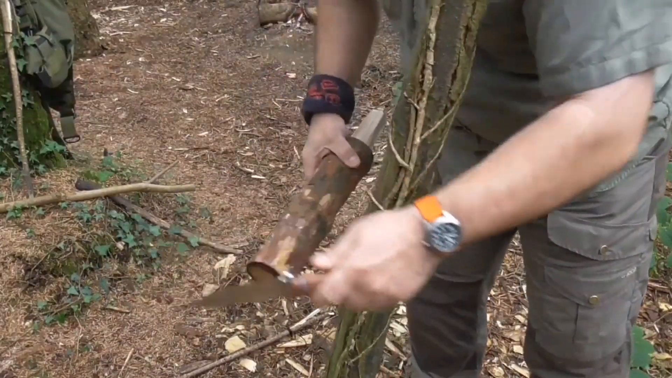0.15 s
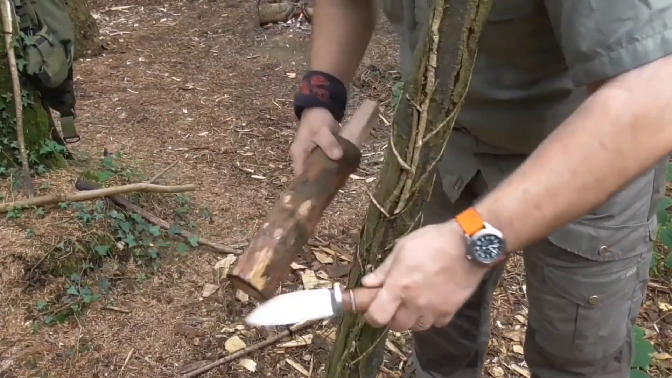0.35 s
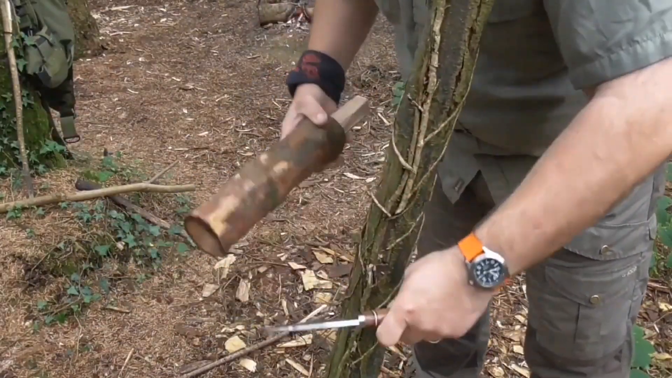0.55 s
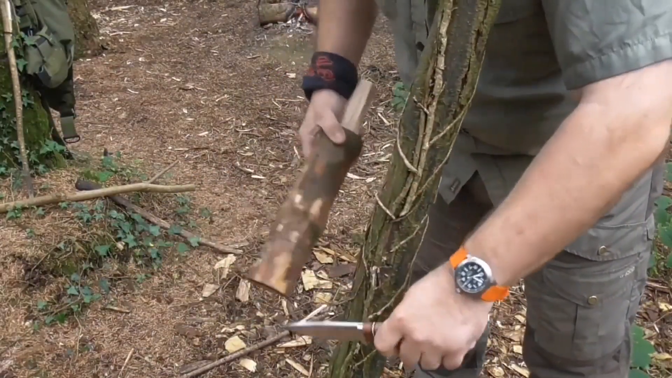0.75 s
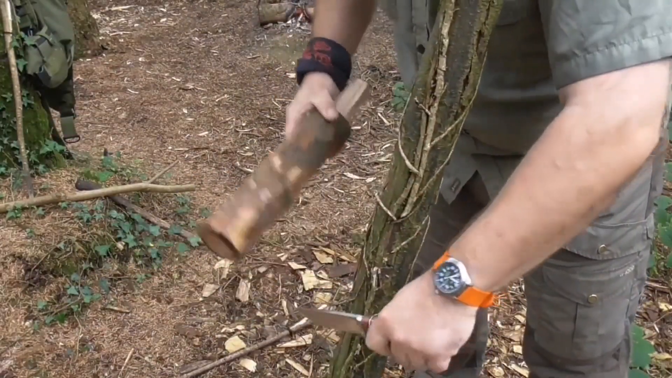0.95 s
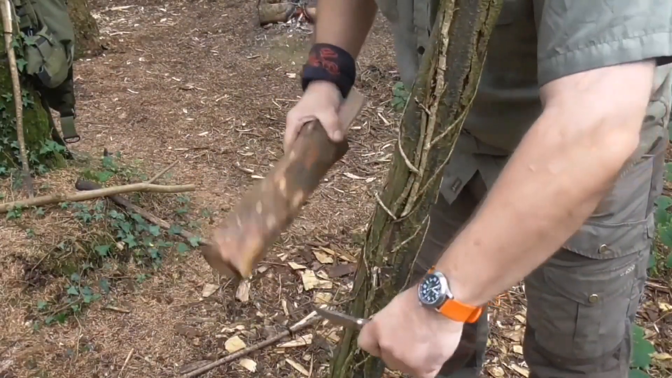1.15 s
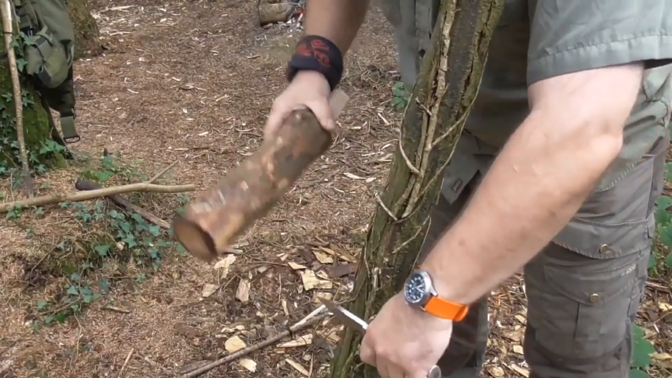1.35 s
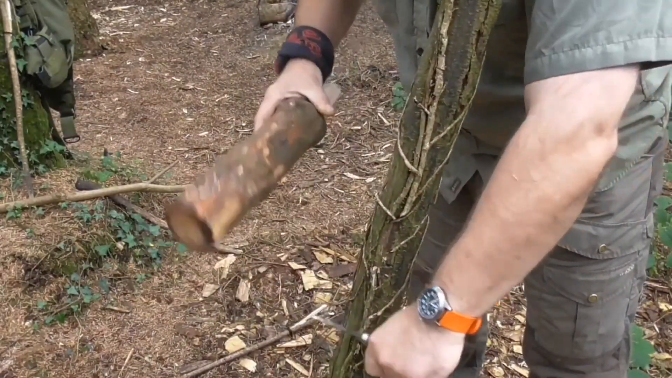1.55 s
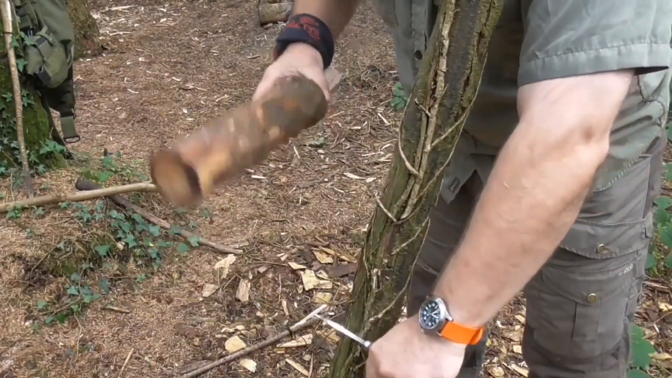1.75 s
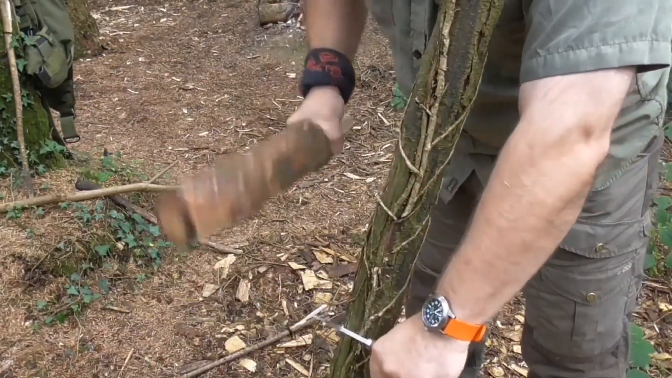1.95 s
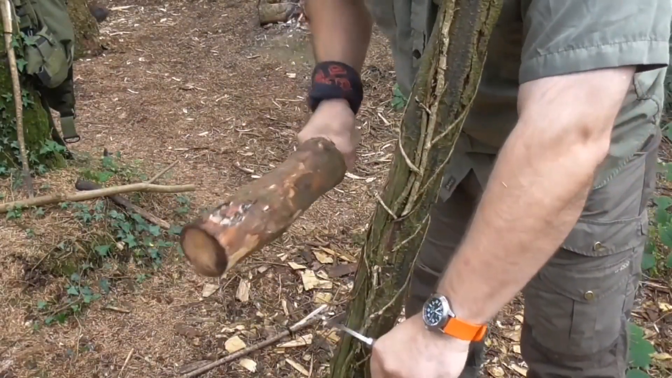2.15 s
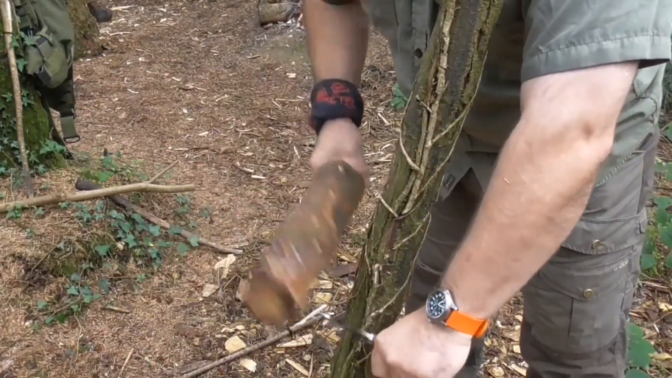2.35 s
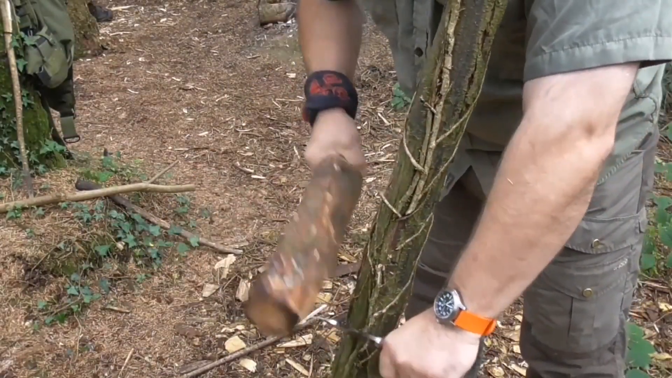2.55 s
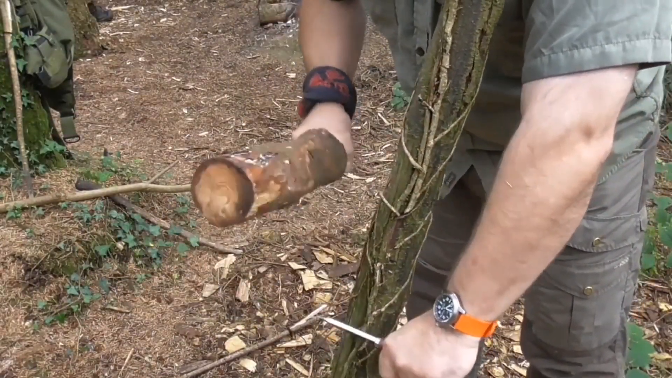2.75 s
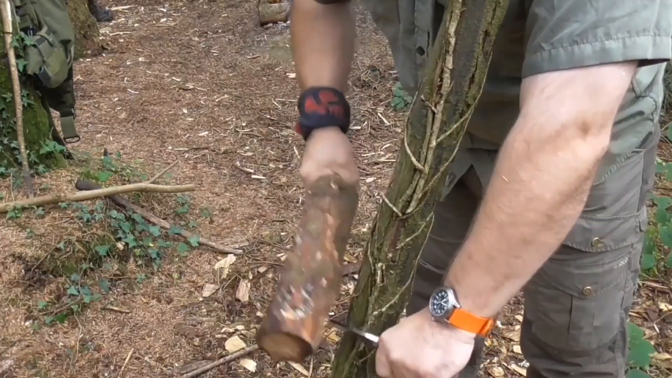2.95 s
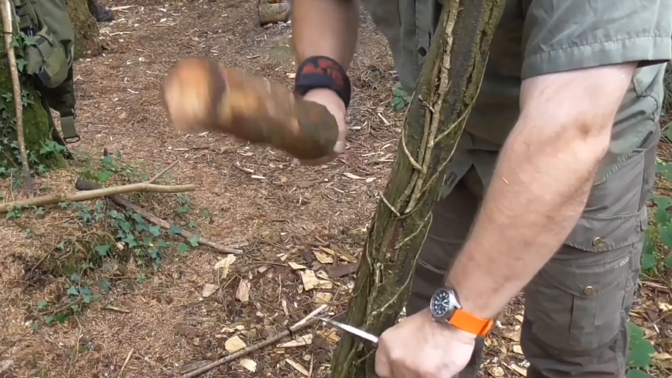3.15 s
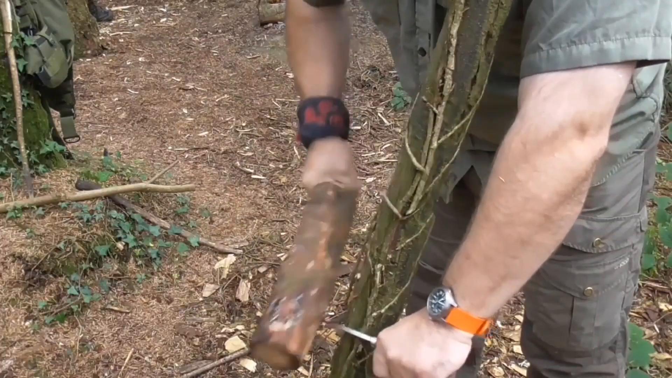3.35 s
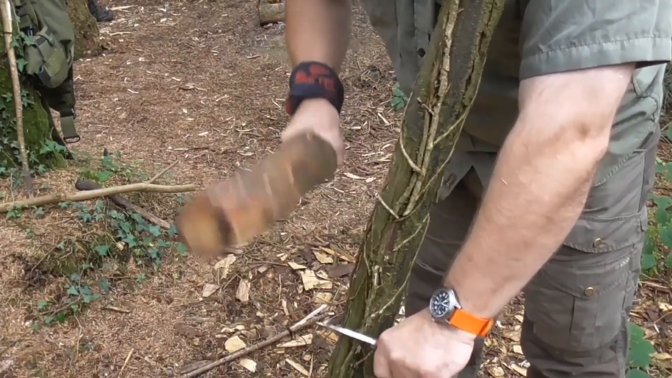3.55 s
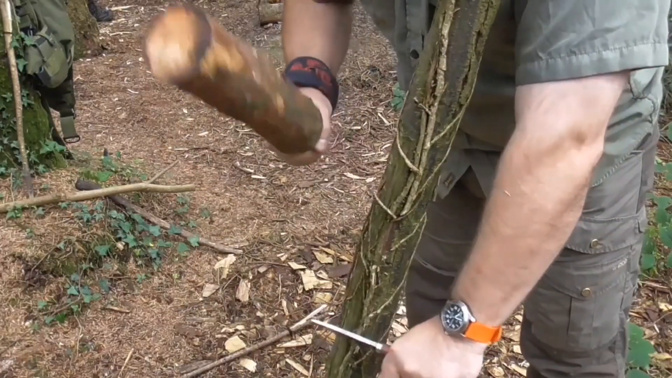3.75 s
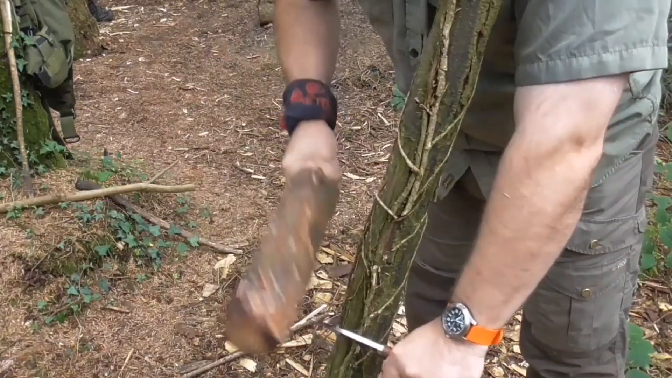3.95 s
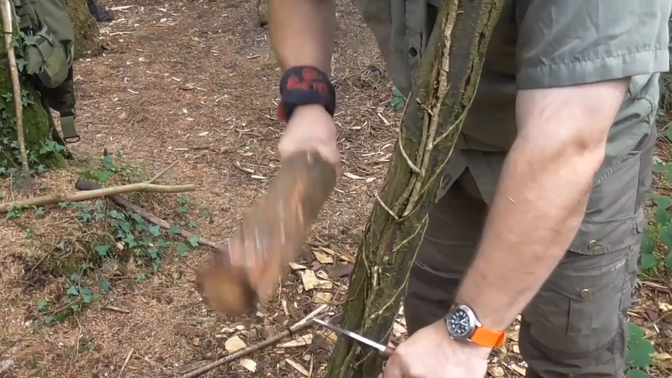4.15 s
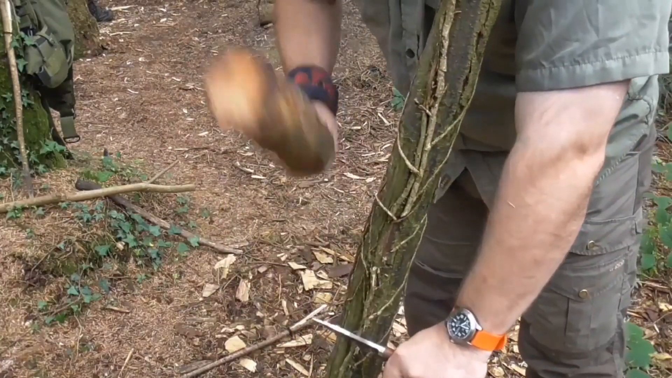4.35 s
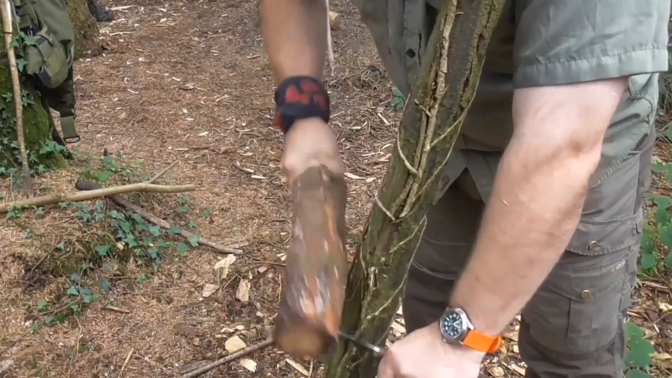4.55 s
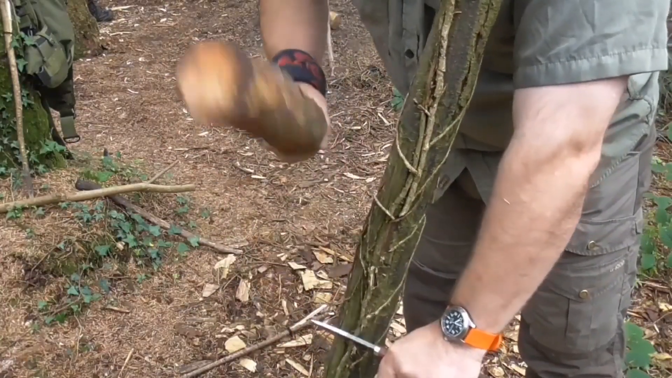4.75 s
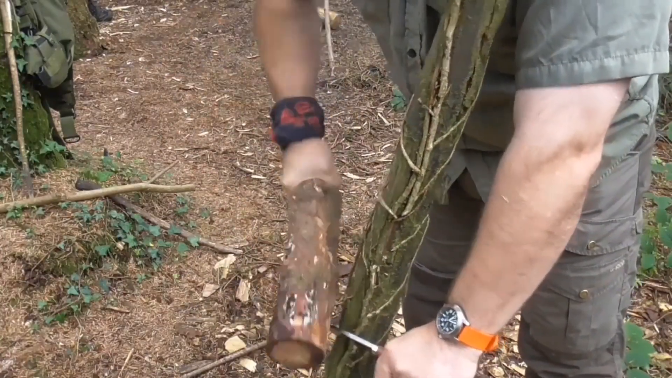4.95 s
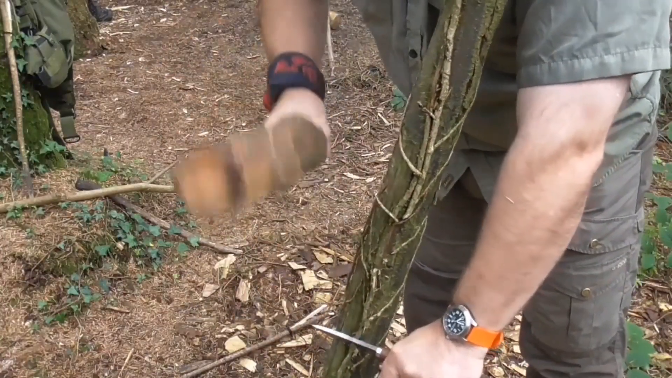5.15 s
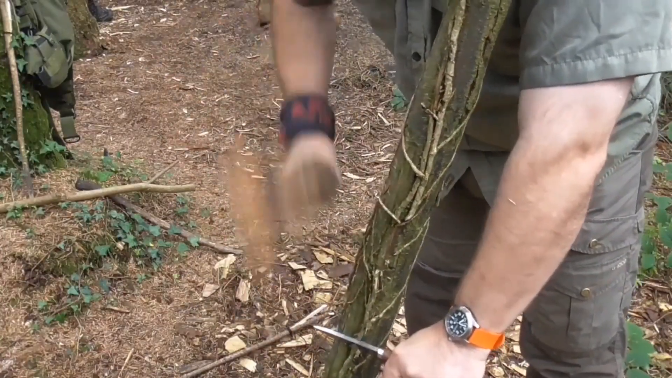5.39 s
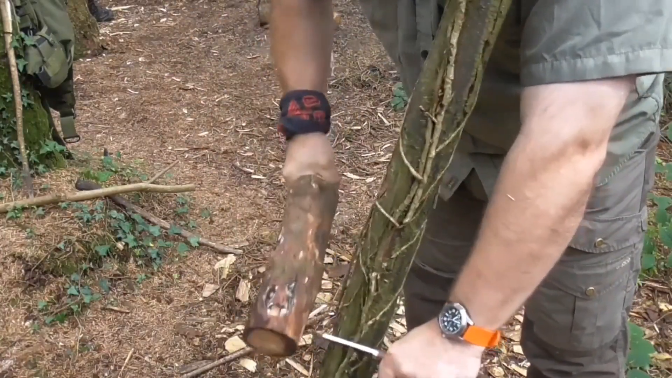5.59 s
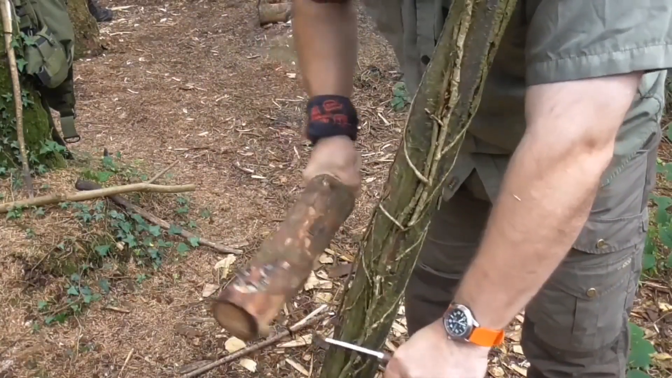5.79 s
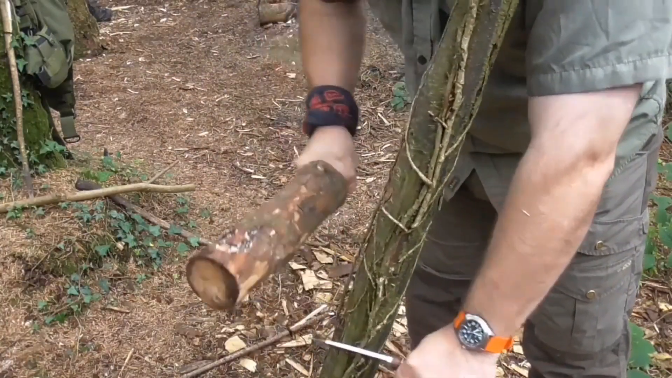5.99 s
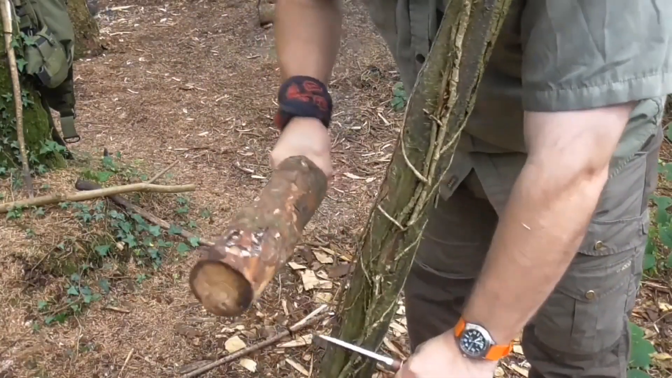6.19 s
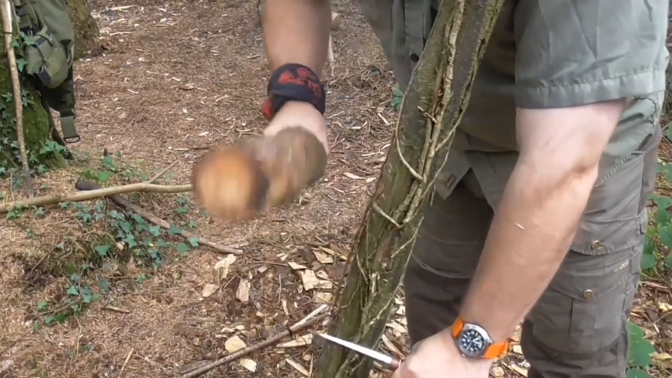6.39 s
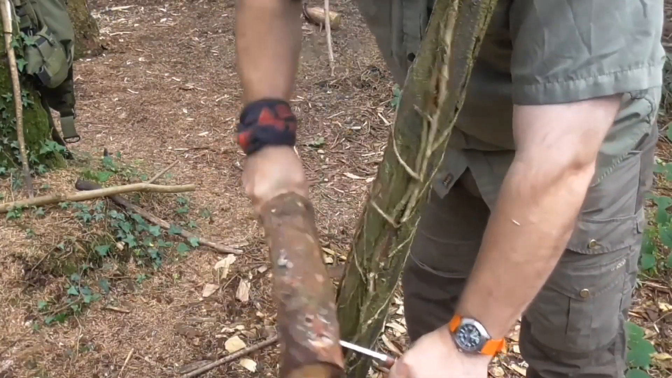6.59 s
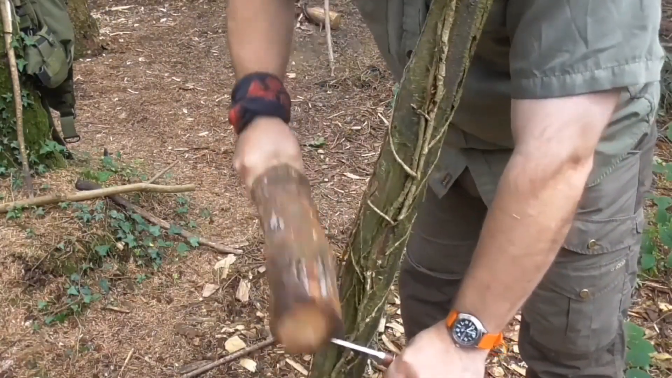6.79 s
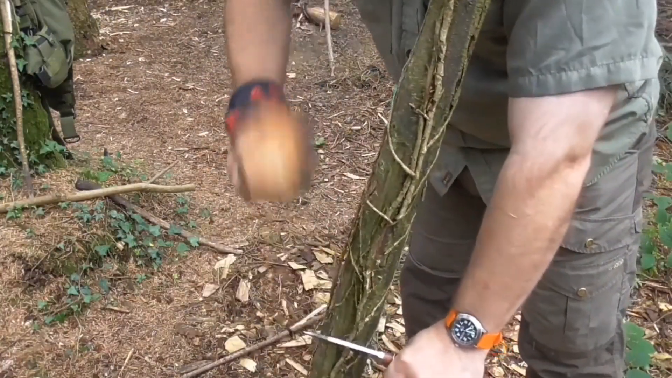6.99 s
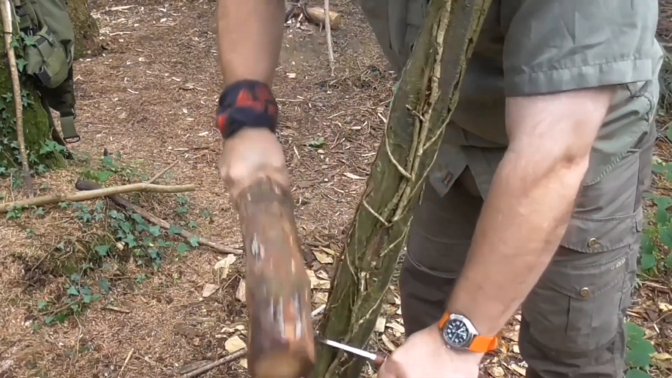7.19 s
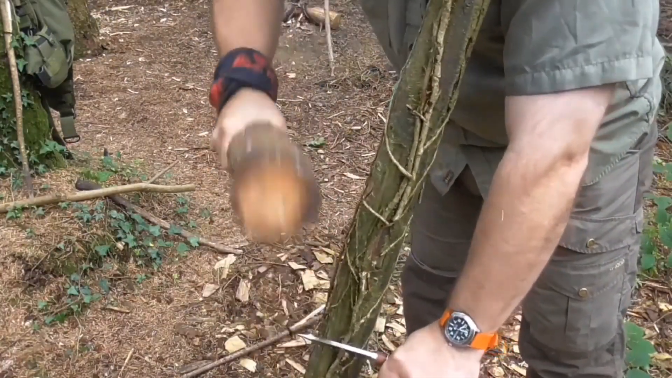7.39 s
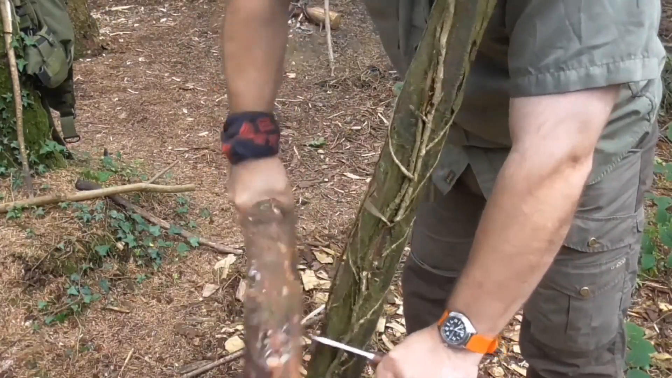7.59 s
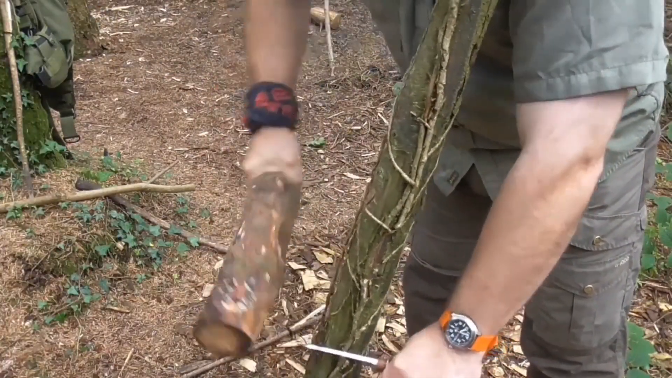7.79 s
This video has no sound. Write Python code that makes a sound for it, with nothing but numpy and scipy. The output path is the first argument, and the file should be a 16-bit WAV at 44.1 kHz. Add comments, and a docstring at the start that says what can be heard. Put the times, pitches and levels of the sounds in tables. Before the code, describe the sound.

Quiet woods, close stereo microphone: uneven low rumble, a far dull drone and thin steady hiss. From 0 to 0.9 s cloth rustles, a hand scuffs bark and a blade scrapes lightly, with a clear tick at 0.25. Short, slightly hollow scrapes return between 1.2 and 2.2 s, with ticks near 1.6 and 2.1. A wooden baton then knocks a knife into a standing trunk at about 2.65, 3.13, 3.57, 4.24 (weaker), 4.70, 5.16 and 5.65 s. Each blow is a dry, very short mid-pitched knock with a bright steel-and-fibre crack, small thud, grit and occasional tiny rebounds. The first is moderate and grittier; most others are loud. A pause holds soft rustling and bark ticks around 6.1-6.5 s, then strong knocks come at 6.83, 7.32 and 7.80, the last cut off by the ending. Echo is faint; the background ducks after loud blows.

```python
"""First a low rumble, a far drone and hiss in the woods, with rustling cloth, scraping bark and small ticks.
Then a wooden baton drives a knife into a standing trunk: ten dry knocks, each with a crack and falling grit.
Knocks are short ringing tones set off by clicks; cracks, grit, scrapes and air are coloured noise.
The recorder's gain control ducks after loud blows and climbs back."""
import sys
import numpy as np
from scipy import signal
from scipy.fft import rfft, irfft, next_fast_len
from scipy.io import wavfile

SR = 44100
rng = np.random.default_rng(int(sys.argv[2]) if len(sys.argv) > 2 else 0)


def wav_record(signal):
    """Record a signal, one row per channel, as 16-bit PCM in the file named by sys.argv[1]."""
    frames = np.transpose(np.atleast_2d(signal))
    bounded = np.clip(frames, -1, 1)
    # unit amplitude maps onto the largest positive 16-bit level
    quanta = np.round(bounded * 32767).astype(np.int16)
    wavfile.write(sys.argv[1], SR, quanta)


N = 345303   # length [samples]

# In all that follows, t60 is the time in which a sound falls by 60 dB.
# Colours of the air: (frequency [Hz], level per Hz [dB])
RUMBLE_COLOUR = [(25, -23), (60, 4), (110, -1.5), (160, 9), (230, -2), (330, -37)]
DRONE_COLOUR = [(120, -13.5), (200, -8), (350, -5), (620, -5), (950, -8), (1250, -14), (1550, -18),
                (1750, -26), (2600, -27), (3400, -61.5)]
RUSTLE_COLOUR = [(1500, 2.5), (2500, -4), (3500, -1.5), (4600, 3.5), (5800, -4.5), (9000, -5.5),
                 (14000, -9)]
HISS_COLOUR = [(1060, -48), (1800, -23), (2500, -8), (3030, 1), (4740, 0.5), (5750, -2), (9770, 2.5),
               (14200, -3), (15100, -19), (15700, -57)]
HISS_DB = -66.5
# How alike the air is at left and right: (frequency [Hz], likeness [-1 to 1])
AIR_LIKENESS = [(30, -.4), (60, -0.89), (110, 0.43), (200, 0.88), (400, 0.76), (700, 0.76), (1300, .43),
                (2400, 0.33), (8000, -0.14), (15000, 0.66)]
# How the low rumble rises and falls: (time [s], level [dB])
RUMBLE_LEVEL = [(0, -60.5), (.8, -63), (1.55, -70), (2.5, -62.5), (3.0, -63), (3.5, -54), (3.75, -59.5),
                (4.3, -54), (5.1, -58), (5.3, -61), (5.8, -62), (6.4, -58.5), (6.75, -57), (6.95, -61.5),
                (7.25, -52.5), (7.55, -74), (7.83, -57)]
# How the far drone rises and falls: (time [s], level [dB])
DRONE_LEVEL = [(0, -56.5), (3.0, -55), (4.2, -53.5), (5.8, -54.5), (6.5, -53), (7.83, -53)]
# Cloth rustles as the arms shift: (middle [s], length [s], level [dB])
CLOTH_RUSTLES = [(0.305, 0.93, -57.5), (1.5, 0.99, -73), (2.5, 0.35, -69.5), (6.304, 0.37, -64),
                 (6.556, 0.82, -64)]
# long rustling reverb of the woods after each blow; level against the blow
WOODS_REVERB_DB, WOODS_REVERB_T60_S = -52.5, 1.17
STROKE_EDGE_DB = 18.5   # a gesture is this much fainter at its ends than in its middle

# Strokes of the blade on bark: (middle [s], length [s], scrape level [dB], hollow ring level [dB])
BLADE_STROKES = [(0.138, 0.28, -57.5, -64), (.38, 0.13, -62.5, -72), (0.565, .14, -61, -87),
                 (0.756, 0.22, -62.5, -94), (1.206, 0.086, -66, -64.5), (1.275, 0.041, -61.5, -82),
                 (1.409, .07, -62.5, -65.5), (1.813, 0.081, -55.5, -59), (1.85, 0.018, -67, -58),
                 (2.045, 0.14, -57.5, -57), (2.207, 0.065, -57.5, -63)]
# Colour of the blade's scrape: (frequency [Hz], level per Hz [dB])
SCRAPE_COLOUR = [(900, -14), (2600, -8.5), (3700, 2.5), (4800, 0), (6200, -4.5), (8500, 0), (11500, -2.5),
                 (15000, -9)]
# Colour of a hand scuffing the bark: (frequency [Hz], level per Hz [dB])
SCUFF_COLOUR = [(500, -31), (1000, -2), (1300, 0), (1700, -6), (2300, -6.5), (3200, -23)]
SCUFF_MIDDLE_S, SCUFF_LENGTH_S, SCUFF_DB = 0.171, 0.13, -54.5
HOLLOW_HZ, HOLLOW_T60_S = 1487, 0.03

# Ticks of bark and twigs: (time [s], level [dB], pitch [Hz], left above right [dB])
BARK_TICKS = [(0.2541, -30.5, 4630, 3), (1.277, -49.5, 4310, -0.5), (1.6365, -31, 9150, -0.5),
              (2.1168, -35, 9400, -1.0), (2.8689, -38.5, 11500, -0.5), (3.4491, -45, 11000, 5),
              (4.0377, -41, 5070, 1), (4.074, -42, 12100, -1.5), (4.4622, -40.5, 10900, -3),
              (5.2924, -39, 11000, 2), (5.4725, -41, 8130, -1), (6.097, -38, 11000, -0.5),
              (6.2534, -39, 8500, 9), (6.4223, -36.5, 8200, -7), (6.4682, -31.5, 9600, 2),
              (7.4807, -34.5, 10600, -5), (7.672, -40, 10000, -0.5)]
FAINT_TICKS, FAINT_TICK_DB = 12, -50   # number of fainter ticks at random times, and their middle level

# Blows of the baton: (time [s], main knock [Hz], low knock [Hz], strength [dB],
# then against that strength: trunk [dB], low knock [dB], main knock [dB], upper baton [dB], crack [dB], grit [dB])
BATON_BLOWS = [(2.6549, 716, 346, -12.5, -24, -17.5, -16.5, -3, -10.5, -15),
               (3.1270, 790, 285, -6, -20, -22.5, -14, -16.5, -10, -37),
               (3.5713, 906, 300, -0.5, -31, -19, -14, -22, -14.5, -27.5),
               (4.2396, 804, 265, -18.5, -14.5, -18, -15, -13.5, -9, -26),
               (4.6972, 813, 270, -2, -21, -27, -13.5, -30, -12, -43),
               (5.164, 840, 336, -0.5, -39, -19, -13, -24.5, -14, -28.5),
               (5.6484, 823, 349, -3.5, -29.5, -16.5, -14.5, -11.5, -9, -31.5),
               (6.8297, 752, 323, -2.5, -18.5, -24, -13.5, -17, -10, -35.5),
               (7.3213, 753, 336, -2, -18.5, -20.5, -16, -11, -10, -35),
               (7.805, 715, 340, 0.5, -38.5, -16, -21.5, -7.5, -16.5, -44)]
# Rebounds and loose bits after a blow: (time [s], crack level [dB], knock level [dB])
REBOUNDS = [(2.662, -35, -55), (2.665, -52, -38), (3.223, -63, -50), (3.594, -61, -63), (4.259, -69, -62),
            (4.286, -70, -52), (4.752, -40.5, -69), (5.197, -41.5, -42), (5.209, -53, -44),
            (5.680, -46, -61), (7.349, -47, -41)]
# Ringing tones of the trunk, baton and blade: (frequency [Hz], level [dB], t60 [s])
WOOD_TONES = [(180, 3, .045), (1320, 1, .025), (2080, 3, .012), (2480, 2, .012)]
# The body each of those tones belongs to: (body [0 trunk, 1 upper baton, 2 blade])
TONE_BODY = [0, 1, 2, 2]
# Parts of the main knock, whose pitch shifts with the spot struck: (ratio to its pitch, level [dB], t60 [s])
MAIN_KNOCK_PARTS = [(.79, -23.5, 0.056), (0.971, -4, 0.013), (1.19, 1.5, 0.014)]
BITE_S, BITE_DB = 0.001404, 5   # the blade bites this long after the baton's touch, and this much harder
LOW_DELAY_S, LOW_T60_S, LOW_DB = 0.0018, 0.032, 5.5   # LOW_DB is added to every low knock
BLADE_DB, SINK_DB_PER_S = -13, 2.0   # the blade rings less as it sinks into the wood
# Colours of the blow's noises: (frequency [Hz], level per Hz [dB])
DULL_CRACK_COLOUR = [(2200, -32.5), (3100, -27.5), (3800, 6.5), (5500, 0), (7000, -16.5), (9000, 6)]
BRIGHT_CRACK_COLOUR = [(5500, 2.5), (7500, 4), (9000, 3.5), (11000, 5.5), (13500, -7.5), (16500, -8.5)]
GRIT_COLOUR = [(900, 4.5), (2000, 3.5), (4500, 2), (6500, -2), (9500, 4.5), (15000, -15.5)]
THUD_COLOUR = [(40, -35), (90, -26.5), (170, -12), (350, -4), (800, -12.5), (1400, -20.5), (2200, -47.5)]
CRACK_DELAY_S, CRACK_T60_S, DULL_DB = 0.0005, 0.016, -7.5   # DULL_DB: dull crack against the bright one
DULL_GRAIN_DB, BRIGHT_GRAIN_DB = 3, 1   # how uneven the splinters of each crack are
GRIT_T60_S, THUD_T60_S = 0.081, 0.074
THUD_DB, THUD_FOLLOWS_GRIT = -8, 0.39   # blows with louder grit also thud louder, by this share in dB
GROUND_ECHO_S, GROUND_ECHO_DB = 0.0041, -15.5
SCATTER_DB, SCATTER_T60_S = -44.5, 0.26   # short scatter from the trees

DUCK_ABOVE_DB, DUCK_SHARE, RECOVERY_DB_PER_S, DUCK_SMOOTH_S = -10.5, 0.61, 22, 0.021
TOP_CUT_HZ = 16830   # from here up the sound is at least 70 dB down


def from_db(db):
    """Turn decibels into a gain."""
    return 10 ** (np.asarray(db) / 20)


def rms_one(x):
    """Scale a sound to an average strength (rms) of 1."""
    return x / np.sqrt(np.mean(x ** 2) + 1e-20)


def level_in_time(rows):
    """Read a level table at every sample."""
    s, level_db = np.transpose(rows)
    return np.interp(np.arange(N) / SR, s, level_db)


def at_hz(points, hz):
    """Read a spectrum table with straight lines over log frequency."""
    table_hz, value = np.transpose(points)
    return np.interp(np.log(hz), np.log(table_hz), value)


def drift(rate_hz):
    """Wander at random with spread 1: white noise smoothed twice by a one-pole low-pass."""
    step = 40   # computed at every 40th sample, then joined by straight lines
    r = np.exp(-2 * np.pi * rate_hz * step / SR)
    white = rng.standard_normal(N // step + 2002)
    slow = signal.lfilter([1], [1, -2 * r, r * r], white)[2000:]   # skip the filter's start
    return np.interp(np.arange(N) / step, np.arange(len(slow)), rms_one(slow))


def clicks(times_s, db):
    """Place single-sample clicks in near silence."""
    out = np.full(N, 1e-18)
    out[np.round(np.asarray(times_s) * SR).astype(int)] = from_db(db)
    return out


def ring(x, hz, t60):
    """A resonator: a click of height 1 starts a dying sine of height 1."""
    r = from_db(-60 / (t60 * SR))
    w = 2 * np.pi * hz / SR
    return signal.lfilter([0, np.sin(w)], [1, -2 * r * np.cos(w), r * r], x)


def dying(x, t60):
    """Turn each click into a level curve that falls 60 dB in t60."""
    return signal.lfilter([1], [1, -from_db(-60 / (t60 * SR))], x)


def noise(colour, alike, grain_db=0.):
    """Stereo noise with a given colour and left-right likeness, optionally grainy; rms 1."""
    size = next_fast_len(N)
    hz = np.maximum(np.arange(size // 2 + 1) * SR / size, 1)
    grain = np.minimum(rng.exponential(1, size), 5)
    white = rng.standard_normal((2, size)) * from_db(grain_db * grain)
    mid, side = rfft(white) * from_db(at_hz(colour, hz))
    likeness = np.clip(at_hz(alike, hz) if np.ndim(alike) else alike, -1, 1)
    # the side part enters left and right with opposite signs
    both = np.sqrt(1 + likeness) * mid + np.sqrt(1 - likeness) * side * [[1], [-1]]
    return rms_one(irfft(both, size)[:, :N])


def swell(middle_s, length_s, db):
    """The level of a gesture that swells to its middle and fades again."""
    away = (np.arange(N) / SR - middle_s) / (length_s / 2)
    return from_db(db - STROKE_EDGE_DB * np.minimum(away ** 2, 9))


def high_pass(x, hz):
    """Steeply remove what lies below a frequency."""
    return signal.sosfilt(signal.butter(4, hz, "high", fs=SR, output="sos"), x)


def air():
    """Rumble, far drone, rustling cloth, the woods' reverb and steady hiss: coloured noises with own levels."""
    rumble_level = from_db(level_in_time(RUMBLE_LEVEL) + 2.2 * drift(8))
    rumble = rumble_level * noise(RUMBLE_COLOUR, AIR_LIKENESS)
    drone_level = from_db(level_in_time(DRONE_LEVEL) + 0.82 * drift(23))
    drone = drone_level * noise(DRONE_COLOUR, AIR_LIKENESS)
    cloth = sum(swell(*row) for row in CLOTH_RUSTLES)
    s, _, _, blow_db = np.transpose(BATON_BLOWS)[:4]
    reverb = dying(clicks(s, blow_db + WOODS_REVERB_DB), WOODS_REVERB_T60_S)
    rustle_level = (cloth + reverb) * from_db(0.76 * drift(25))
    rustle = rustle_level * noise(RUSTLE_COLOUR, 0.43, grain_db=4.0)
    hiss = from_db(HISS_DB) * noise(HISS_COLOUR, AIR_LIKENESS)
    return rumble + drone + rustle + hiss


def scrapes():
    """A hand scuffs bark; the blade scrapes in dense bright grains, with a hollow ring made from noise."""
    bright = noise(SCRAPE_COLOUR, 0.93, grain_db=1.0)
    hollow = rms_one(ring(rng.standard_normal(N), HOLLOW_HZ, HOLLOW_T60_S))
    scuff_level = swell(SCUFF_MIDDLE_S, SCUFF_LENGTH_S, SCUFF_DB) * from_db(3.0 * drift(60))
    out = scuff_level * noise(SCUFF_COLOUR, 1.0, grain_db=6.0)
    for middle_s, length_s, scrape_db, hollow_db in BLADE_STROKES:
        rubbing = from_db(scrape_db) * bright + from_db(hollow_db) * hollow
        out = out + swell(middle_s, length_s, 0) * rubbing
    return out * from_db(2.7 * drift(72))


def ticks():
    """Bits of bark snap: a few cycles at a pitch of their own and a short bright puff."""
    # random rows of time, level, pitch and pan: width times chance, plus the lowest value
    chance = rng.random((FAINT_TICKS, 4))
    faint = chance * [N / SR - .1, 6, 8000, 8] + [0, FAINT_TICK_DB - 3, 4000, -4]
    rows = np.vstack([BARK_TICKS, faint])
    out = np.zeros((2, N))
    for s, tick_db, hz, pan_db in rows:
        i = round(s * SR)
        click = np.eye(1, 800)[0]
        snap = high_pass(ring(click, hz, t60=16 / hz), .75 * hz)
        out[:, i:i + 800] += snap * from_db(tick_db + pan_db * np.array([[.5], [-.5]]))
    puff = dying(clicks(rows[:, 0], rows[:, 1] - 17), 0.027)
    return out + puff * noise(BRIGHT_CRACK_COLOUR, 0.55)


def knocks():
    """Each blow sets wood and blade ringing; they move away from the listener first, and contact is soft."""
    s, main_hz, low_hz, blow_db, trunk_db, low_db, main_db, upper_db, *_ = np.transpose(BATON_BLOWS)
    body_db = [trunk_db, upper_db, BLADE_DB - SINK_DB_PER_S * (s - s[0])]
    again_s, _, again_db = np.transpose(REBOUNDS)
    out = np.zeros(N)
    for (hz, tone_db, t60), body in zip(WOOD_TONES, TONE_BODY):
        start_s = s + LOW_DELAY_S * (body == 0)   # the heavy trunk answers late
        hits = clicks(start_s, blow_db + body_db[body] + tone_db)
        rebounds = clicks(again_s, again_db + tone_db)
        out -= ring(hits + rebounds, hz, t60)
    for k, start_s in enumerate(s):
        part = out[round(start_s * SR):][:SR // 10]   # a window into out: changes land there
        touch, bite, late = (np.eye(1, len(part), round(lag_s * SR))[0]
                             for lag_s in (0, BITE_S, LOW_DELAY_S))
        # baton on blade, then blade in wood
        push = (touch + from_db(BITE_DB) * bite) * from_db(blow_db[k] + main_db[k])
        main = sum(ring(push * from_db(part_db), ratio * main_hz[k], t60)
                   for ratio, part_db, t60 in MAIN_KNOCK_PARTS)
        part -= signal.lfilter([1, -1], [1, -.97], main)   # a swinging stick moves no air far below its pitch
        low_push = from_db(blow_db[k] + low_db[k] + LOW_DB) * late
        part -= ring(low_push, low_hz[k], LOW_T60_S)
    return signal.lfilter([.3], [1, -.7], out)   # soft contact dulls the treble


def blows():
    """Knock, crack of steel and fibres, grit and trunk thud; the ground echoes and the trees scatter a tail."""
    s, _, _, blow_db, *_, crack_db, grit_db = np.transpose(BATON_BLOWS)
    again_s, again_db, _ = np.transpose(REBOUNDS)
    again = dying(clicks(again_s, again_db), 0.024)
    first = dying(clicks(s + CRACK_DELAY_S, blow_db + crack_db), CRACK_T60_S)
    dull_level = from_db(DULL_DB) * first + again
    dull = dull_level * noise(DULL_CRACK_COLOUR, 0.66, grain_db=DULL_GRAIN_DB)
    bright = (first + again) * noise(BRIGHT_CRACK_COLOUR, 0.86, grain_db=BRIGHT_GRAIN_DB)
    grit_level = dying(clicks(s, blow_db + grit_db), GRIT_T60_S) * from_db(3 * drift(80))
    grit = grit_level * noise(GRIT_COLOUR, 0.62, grain_db=3.0)
    thud_db = blow_db + THUD_DB + THUD_FOLLOWS_GRIT * grit_db
    thud = dying(clicks(s + 0.0015, thud_db), THUD_T60_S) * noise(THUD_COLOUR, 0.83)
    direct = knocks() + dull + bright + grit + thud
    direct = high_pass(direct, hz=109.0)   # the blows carry no deep bass
    lag = round(GROUND_ECHO_S * SR)
    echo = from_db(GROUND_ECHO_DB) * np.pad(direct, ((0, 0), (lag, 0)))[:, :N]
    scatter = dying(clicks(s, blow_db + SCATTER_DB), SCATTER_T60_S) * noise(GRIT_COLOUR, 0.12)
    return direct + echo + scatter


def scene():
    """Everything the microphones hear; the blows lean slightly to the right."""
    return air() + scrapes() + ticks() + blows() * from_db([[-.4], [.4]])


def record(dry):
    """The gain ducks quickly at a loud peak and climbs back steadily; the top is cut."""
    peak_db = 20 * np.log10(np.abs(dry).max(axis=0) + 1e-9)
    over_db = np.maximum(peak_db - DUCK_ABOVE_DB, 0)
    # the highest value so far on a rising ramp, less the ramp: held peaks that sink steadily
    ramp = RECOVERY_DB_PER_S * np.arange(N) / SR
    held_db = np.maximum.accumulate(DUCK_SHARE * over_db + ramp) - ramp
    r = np.exp(-1 / (DUCK_SMOOTH_S * SR))
    duck_db = signal.lfilter([1 - r], [1, -r], held_db)
    ducked = dry * from_db(-duck_db)
    return signal.sosfilt(signal.cheby2(14, 70, TOP_CUT_HZ, fs=SR, output="sos"), ducked)


dry = scene()
out = record(dry)
wav_record(out)
```